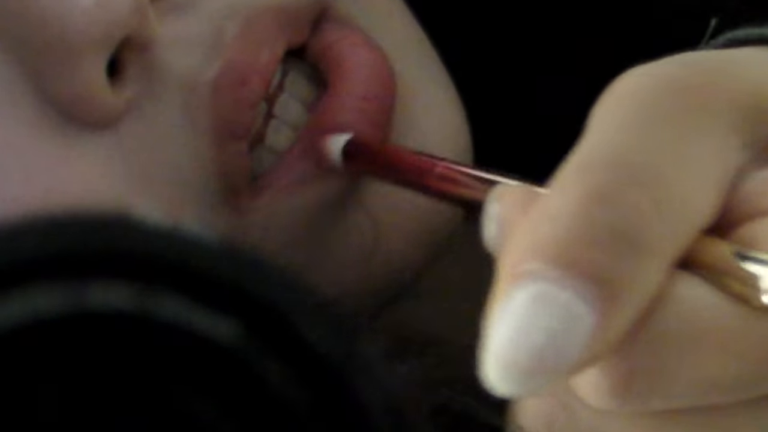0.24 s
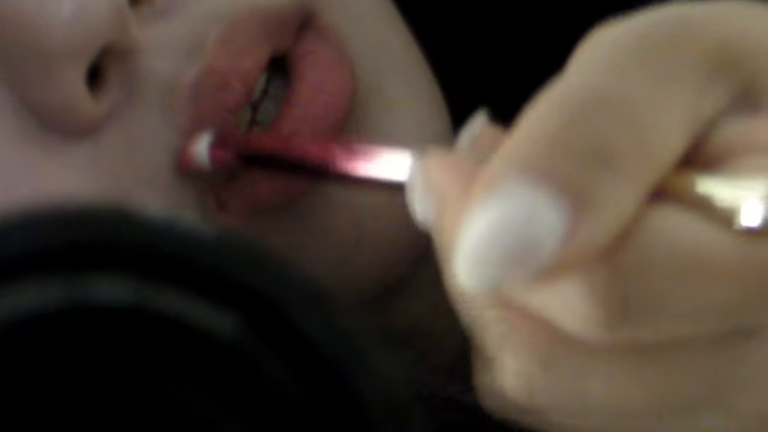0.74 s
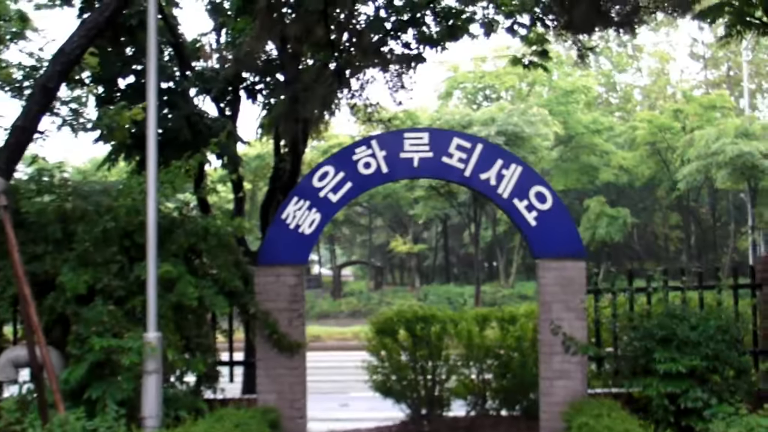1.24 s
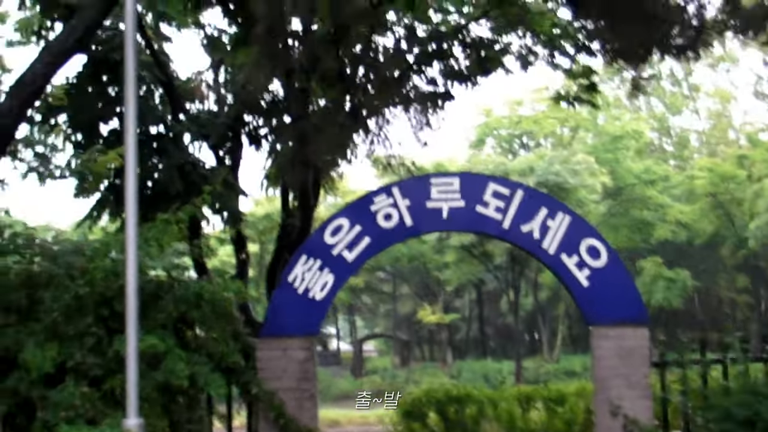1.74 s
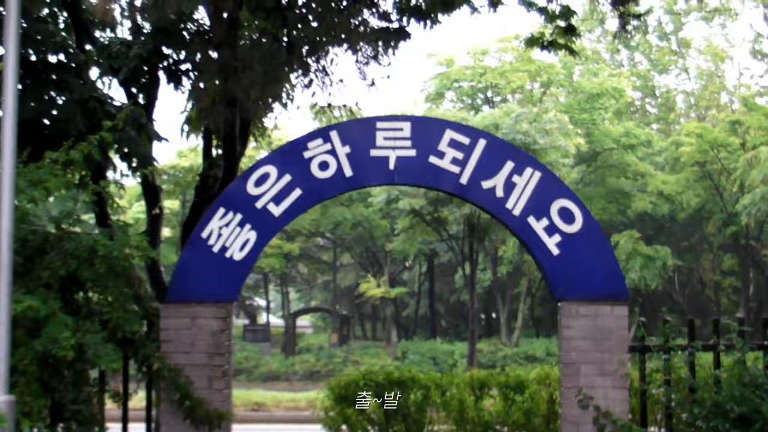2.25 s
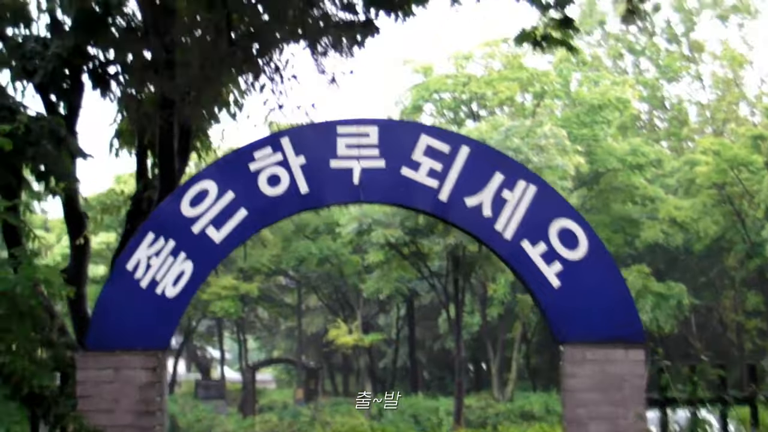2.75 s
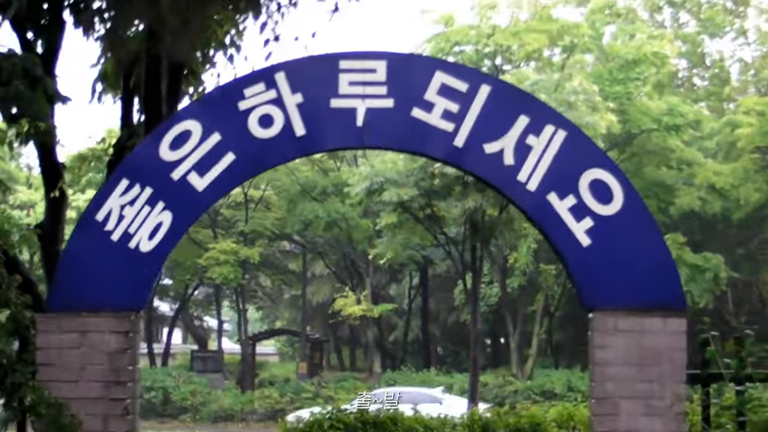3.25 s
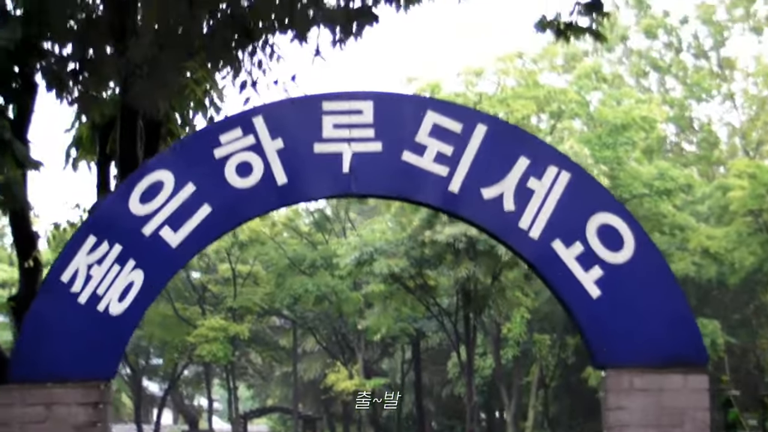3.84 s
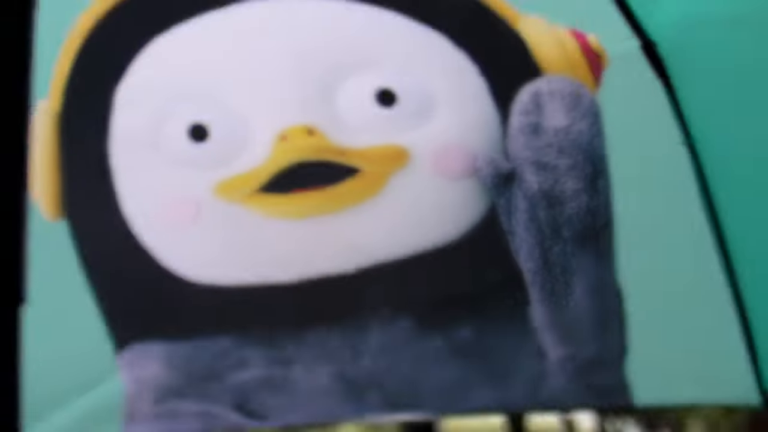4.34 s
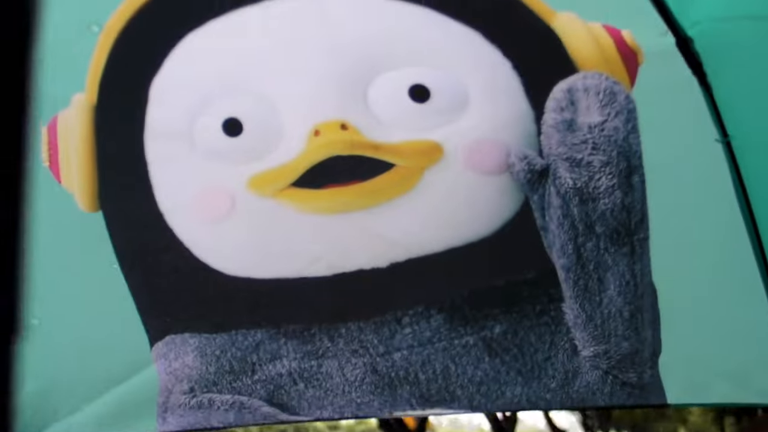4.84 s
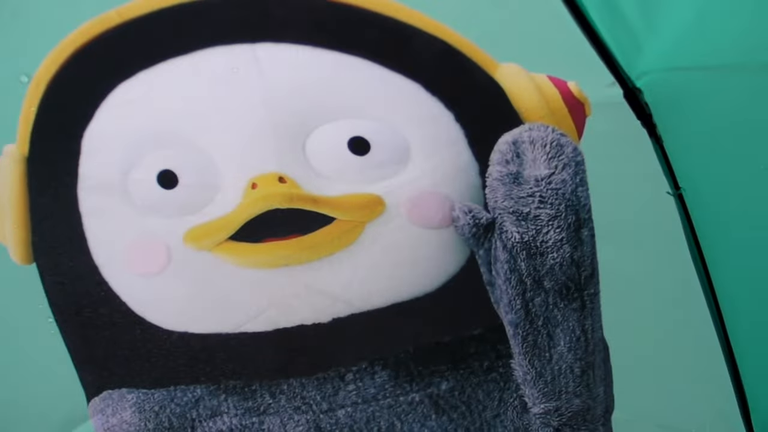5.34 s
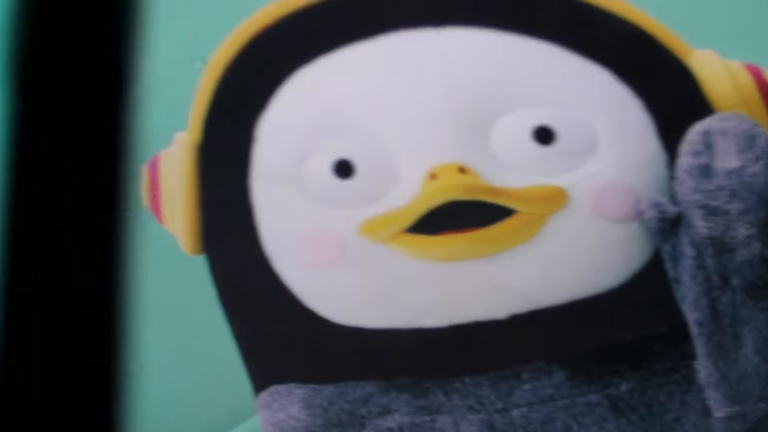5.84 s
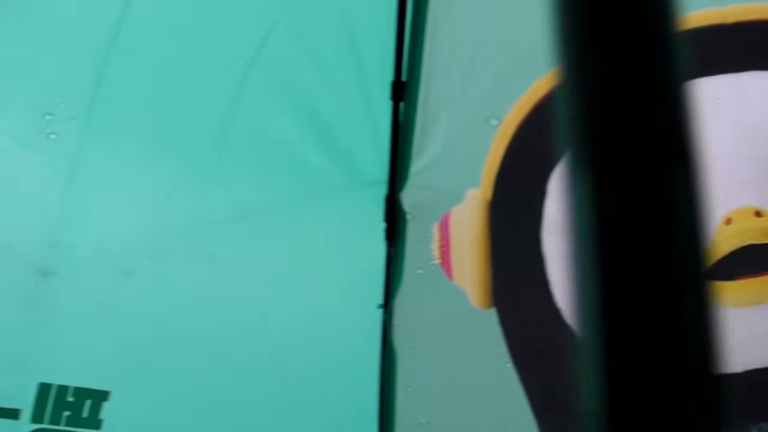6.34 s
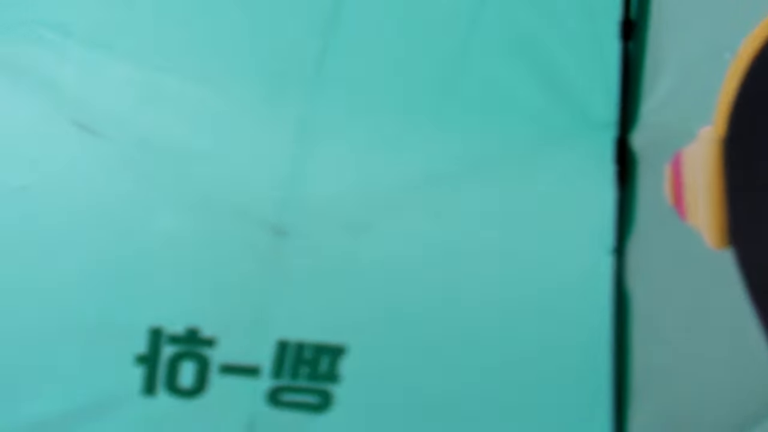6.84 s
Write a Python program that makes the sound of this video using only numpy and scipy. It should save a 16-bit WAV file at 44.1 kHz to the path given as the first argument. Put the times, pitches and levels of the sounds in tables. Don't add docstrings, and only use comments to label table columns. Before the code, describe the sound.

From 0 to 0.9 seconds there is only a quiet room: faint low mains buzz, soft hiss and a barely audible high whine. At 0.9 it cuts abruptly to a rainy roadside, with steady wet tyre roar, low rumble, fine spray and a low engine hum. Small bumps and wind puffs thump at about 1 second; a harder dull knock comes at 1.9, and a crisp drop tick at 2.6. Traffic swells from 3 to 4, with a rough falling engine note around 3.5. At 4.21 the sound drops out for about a twentieth of a second. The second view returns quieter, then builds from 5.3 with coarse tyre drumming, splashes and brighter spray until about 6.3. A car sweeps across the stereo image near 6.7 while an engine note climbs, and wet hiss continues to the cut-off around 7.1.

```python
import sys
import numpy as np
from scipy import signal
from scipy.fft import rfft, irfft, next_fast_len
from scipy.io import wavfile
from scipy.ndimage import uniform_filter1d, map_coordinates

SR = 44100
rng = np.random.default_rng(int(sys.argv[2]) if len(sys.argv) > 2 else 0)


def makeup_ratio(level_db):
    decades = np.asarray(level_db, float) / 20
    return 10 ** decades


def unload_wav(signal):
    wavfile.write(
        sys.argv[1],
        SR,
        np.round(np.clip(np.atleast_2d(signal).T, -1, 1) * 32767).astype(np.int16),
    )


N = 313242

# outdoors starts, falls silent, returns (time [s])
CUTS = (0.8914, 4.2145, 4.2648)
# (time [s], length [s], swell [dB], centre [Hz])
SPLASHES = [(.9, .1, 1.5, 12000), (2.03, 0.068, 0.5, 7000), (2.09, 0.055, 2, 9800),
            (2.625, 0.013, 14, 11000), (2.902, .15, 3.5, 7500), (3.23, 0.057, 3, 6000),
            (3.43, 0.07, 3, 10000), (3.59, 0.064, 3, 2200), (3.82, .15, 5.5, 9000),
            (4.802, 0.14, 4.5, 9800), (5.019, 0.14, 6, 9800), (5.47, .08, 3.5, 2000),
            (5.51, .15, 5.5, 8900), (5.714, 0.072, 3.5, 5500), (5.95, 0.13, 2, 11000),
            (6.5, 0.093, 3, 5530), (6.68, 0.29, 4, 6500), (6.86, .12, 0, 8000)]
# (time [s], length [s], swell [dB], centre [Hz])
JOLTS = [(.97, 0.074, 7, 130), (1.9, .04, 10, 110), (1.78, 0.04, 2, 250), (2.48, 0.057, 5, 240),
         (2.82, 0.028, 2.5, 1000), (3.17, 0.11, 1.5, 750), (3.3, 0.12, 7, 100), (3.5, 0.41, 8.5, 235),
         (4.0, .2, 2, 100), (4.35, 0.061, 8, 240), (4.88, 0.032, 4.5, 900), (5.33, 0.34, 7, 130),
         (5.45, 0.17, 3.5, 400), (6.12, 0.12, 4, 100), (6.25, 0.41, 6.5, 257), (6.6, .2, 1.5, 258),
         (6.9, 0.21, 7.5, 277), (7.08, .1, 5, 129)]


def unit(x):
    return x / np.sqrt(np.mean(x ** 2) + 1e-20)


def along(points, hz):
    f, v = np.transpose(points)
    return np.interp(np.log(hz + 1), np.log(f + 1), v)


def curves(tables):
    s, *cols = np.vstack(tables).T
    return [np.interp(np.arange(N) / SR, s, c) for c in cols]


def wobble(rate):
    knots = rng.standard_normal(int(N * rate / SR) + 4)
    return map_coordinates(knots, [np.arange(N) * rate / SR])


def filtered(x, response):
    m = next_fast_len(N + 8192)
    return irfft(rfft(x, m) * response(np.fft.rfftfreq(m, 1 / SR)), m)[..., :N]


def patchy(depth_db):
    z = signal.stft(rng.standard_normal((2, N)), nperseg=512)[2]
    field = uniform_filter1d(rng.standard_normal(z.shape[1:]), size=6, axis=0)
    field = uniform_filter1d(field, size=10, axis=1)
    return signal.istft(z * makeup_ratio(depth_db * unit(field)), nperseg=512)[1][:, :N]


def coloured(pair, spectrum):
    return unit(filtered(pair, lambda hz: makeup_ratio(along(spectrum, hz))))


def bell(s, length, rise=1):
    t = np.arange(N) / SR - s
    return np.exp(-(t / np.where(t < 0, rise * length, length)) ** 2)


def swells(events, layers_hz):
    width_octaves, rise = 0.59, 0.72
    s, length, db, hz = np.transpose(events)
    octaves = np.log2(np.array(layers_hz)[:, None] / hz)
    near = np.exp(-(octaves / width_octaves) ** 2)
    return near * db @ [bell(a, b, rise) for a, b in zip(s, length)]


def by_view(first, second):
    return np.where(np.arange(N) / SR < CUTS[2], first, second)


def ports(pair, alike, lead_ms, focus, echo, wind):
    hz, t, z = signal.stft(pair, SR, nperseg=1024)
    at, hz = np.minimum((t * SR).astype(int), N - 1), hz[:, None]
    sharp = 1 / (1 + (hz / 12500) ** 4)
    focus = np.clip(focus, 0, .9)[at] * sharp
    echo = np.clip(echo, 0, .5)[at] * sharp / (1 + (1900 / (hz + 1)) ** 4)

    def path(ms):
        return np.exp(-2j * np.pi * hz * ms / 1000)

    like = focus * path(lead_ms[at]) - echo * path(0.353) + (1 - focus - echo) * along(alike, hz)
    like = like * (1 - np.clip(wind, 0, 1)[at] / (1 + (hz / 170) ** 4))
    like = like / np.maximum(np.abs(like) / (1 - .27 * (hz > 2000)), 1)
    right = like * z[0] + np.sqrt(np.abs(1 - np.abs(like) ** 2)) * z[1]
    steer = (1 + like.real) ** (-.3 * (hz > 2000))
    return signal.istft(steer * [z[0], right], SR, nperseg=1024)[1][:, :N]


def room():
    mains_hz, whistle = 59.94, (15734, -65)
    # (multiple of the mains pitch, level [dB])
    hum = [(1, -61), (2, -62), (3, -63), (4, -62), (5, -63), (6, -62), (7, -63), (8, -66), (9, -69)]
    # (frequency [Hz], level [dB per Hz])
    hiss = [(15, -37), (25, -7), (109, -2), (270, -2.5), (353, -2.5), (707, -8.5), (1110, -9),
            (3610, -15.5), (7430, -18.5), (8060, -22), (8730, -18.5), (12000, -24.5), (14900, -19)]
    # (frequency [Hz], likeness [-1 to 1])
    room_alike = [(60, 0.21), (240, 0), (1000, 0), (15000, 0)]
    t = np.arange(N) / SR
    lines = [(k * mains_hz, db) for k, db in hum] + [whistle]
    tones = sum(makeup_ratio(db + .3) * np.sin(2 * np.pi * (hz * t + rng.random())) for hz, db in lines)
    air = coloured(rng.standard_normal((2, N)), hiss + [(14990, -24), (15020, -70)])
    air = ports(air, room_alike, *np.zeros((4, N)))
    return air * makeup_ratio(-49.5) + tones


def gusts():
    together = 1 - 0.38
    # (time [s], length [s], level [dB])
    puff_list = [
        (.98, 0.048, -32.5),
        (1.122, 0.062, -33),
        (1.91, 0.06, -28),
        (2.496, .06, -35),
        (2.704, .03, -35),
        (2.9, 0.055, -36),
        (3.4, .15, -43),
        (3.8, .1, -46),
        (4.07, 0.056, -39),
    ]
    # (frequency [Hz], level [dB per Hz])
    buffet = [(20, -20), (50, 1), (120, 3), (200, -9), (500, -19), (900, -45)]
    a, b = coloured(rng.standard_normal((2, N)), buffet)
    puffs = sum(makeup_ratio(db) * bell(s, length, 0.72) for s, length, db in puff_list)
    return puffs * np.array([a + together * b, together * b - a])


def taps():
    # (time [s], peak [dB], pitch [Hz], time to fade 60 dB [s], right gain)
    contacts = [
        (.965, -22, 130, .06, -.6),
        (1.15, -25, 95, .08, -.6),
        (1.885, -13, 110, .14, .2),
        (2.074, -24, 10650, .1, 0),
        (2.6235, -19, 10400, .02, .4),
        (2.625, -31, 13800, .06, .3),
        (2.625, -30, 11500, .06, .3),
        (2.626, -33, 15000, .05, .3),
    ]
    out, t = np.zeros((2, N + SR)), np.arange(SR // 4) / SR
    for s, db, hz, t60, right in contacts:
        rough = unit(uniform_filter1d(rng.standard_normal(len(t)), size=int(SR / hz * 3) + 1))
        fade = makeup_ratio(db - 60 * t / t60) * (1 - np.exp(-t / 0.00037))
        ring = fade * (1 + 0.4 * rough) * np.sin(2 * np.pi * hz * t)
        out[:, round(s * SR):][:, :len(t)] += [[1], [right]] * ring
    return out[:, :N]


def engines():
    # (start [s], end [s], start pitch [Hz], end pitch [Hz], unsteadiness [Hz], level [dB])
    engine_notes = [
        (0.888, 1.354, 179.5, 180.3, 1.2, -36),
        (1.49, 1.87, 180, 178, 1.2, -36.5),
        (2.5, 4.201, 52.2, 51.5, 4, -39.5),
        (3.31, 3.718, 227.7, 222, 25.3, -33),
        (5.993, 7.054, 230.2, 284.8, 31.3, -37),
    ]
    t, notes = np.arange(N) / SR, 0
    for start, end, hz, end_hz, width_hz, db in engine_notes:
        there = np.clip(np.minimum((t - start) / 0.14, (end - t) / 0.055), 0, 1)
        drift = np.interp(t, [start, end], [hz, end_hz]) + width_hz * 0.298 * wobble(7.5)
        level = makeup_ratio(db + 0.5 + 0.83 * wobble(4.5))
        notes = notes + there * level * np.sin(2 * np.pi * np.cumsum(drift) / SR)
    return notes


def boom():
    start_hz, climb_hz_per_s = 207.4, 8.5
    gear_s, rev_s, rev_hz_per_s = 5.85, 6.45, 60
    t = np.arange(N) / SR
    hz = start_hz + climb_hz_per_s * t + rev_hz_per_s * (t - rev_s) * (t > gear_s)
    level_db = -35.5 + swells(JOLTS, [240])[0]
    slow = filtered(rng.standard_normal((2, 2, N)), lambda f: 1 / (1 + (f / 60) ** 2))
    turn = 2 * np.pi * np.cumsum(hz) / SR
    return makeup_ratio(level_db - 3.5) * unit(slow[0] * np.cos(turn) + slow[1] * np.sin(turn))


def thrum():
    # (time [s], length [s], strength [0-1])
    drum_swells = [
        (5.365, 0.23, 0.76),
        (5.854, 0.22, 0.7),
        (6.104, 0.2, 1),
    ]
    # (frequency [Hz], level [dB per Hz])
    drum_tone = [(350, -30), (520, -4.5), (640, 2), (780, -3), (1100, -27)]
    strength = sum(k * bell(s, length) for s, length, k in drum_swells)
    return makeup_ratio(-28.5) * strength * coloured(patchy(1.4), drum_tone)


def droplets(count, spread_db):
    hits = []
    for where, size in zip(*rng.random((2, 2, count))):
        strength = makeup_ratio(-spread_db * np.log(1 - size))
        hits.append(np.bincount((where * (N - 1)).astype(int), strength, N))
    fade = makeup_ratio(-60 * np.arange(200) / SR / 0.0056)
    return unit(signal.fftconvolve(hits, fade[None], axes=1)[:, :N] * rng.standard_normal((2, N)))


def water():
    # (time [s], amount [dB], fineness [dB])
    spray = [
        [(0.9, -30.5, -13), (1.03, -30.5, -18), (1.5, -32, -15.5), (3.07, -30, -19), (3.26, -27, -17.5),
         (3.82, -29, -17.5), (4.21, -29, -17)],
        [(4.27, -34.5, -14.5), (5.29, -32.5, -13), (5.45, -28, -13), (5.52, -27.5, -8), (5.78, -25.5, -7),
         (6.31, -23.5, -20), (6.78, -24.5, -8.5), (7.09, -25.5, -13.5), (7.1, -29, -13)],
    ]
    # (level against the amount [dB], how far it follows fineness)
    finer = [(0.5, .02), (-5, 0.24), (-11, 0.51), (-16, .98)]
    # (frequency [Hz], level [dB per Hz])
    wet = [(1200, -26), (2300, -1), (3200, -1), (4000, -3), (5000, -7.5), (6500, -14.5), (10000, -38)]
    fine = [(2500, -32), (4200, -4), (5500, -2), (7500, -2), (8800, -8), (12000, -27.5)]
    mist = [(5000, -42), (7500, -16), (8800, 1.5), (11000, -0.5), (11500, -3.5), (11900, -9), (12500, -28)]
    haze = [(11300, -35), (11900, -6), (12400, 4), (13500, 4), (14800, 1), (15300, -5), (15750, -13)]
    drops, wash = droplets(count=9000, spread_db=2.5), unit(patchy(1.0))
    flutter_db = 0.33 * wobble(14)
    amount_db, fine_db = curves(spray)
    levels = [amount_db + db + follows * (fine_db + 17) for db, follows in finer]
    levels = levels + swells(SPLASHES, [3300, 6000, 9800, 13500])
    total = 0
    for db, shape, near in zip(levels, (wet, fine, mist, haze), (0.22, 0.078, 0.1, .3)):
        mix = np.sqrt(1 - near) * wash + np.sqrt(near) * drops
        total = total + makeup_ratio(db + flutter_db) * coloured(mix, shape)
    return total


def road():
    # (time [s], roar [dB], brightness [dB])
    tyres = [
        [(0.9, -33.5, 3.5), (1.16, -32, 3.5), (2.98, -27.5, 0.5), (3.06, -28, 1.5), (3.38, -24.5, -1),
         (3.78, -26, 0), (3.8, -24, -0.5), (4.21, -27, -1)],
        [(4.27, -32.5, 4.5), (4.32, -31, -1.5), (4.69, -32.5, 3.5), (5.35, -25, 0), (6.18, -24.5, -4.5),
         (6.2, -28, 2.5), (6.32, -25.5, 1.5), (6.83, -30.5, 5.5), (7.1, -28.5, 3)],
    ]
    # (frequency [Hz], level [dB per Hz])
    tread = [(450, -33), (700, -8), (850, -1), (955, 1.5), (1060, 0), (1200, -5.5), (1400, -8.5),
             (2500, -29)]
    rumble = [(15, -30), (30, -35), (50, -5.5), (70, -4), (110, -1.5), (160, -0.5), (300, -16), (600, -57)]
    low_roar = [(120, -15), (300, 4), (450, 3), (650, 0), (850, -0.5), (1500, -36)]
    high_roar = [(800, -23.5), (1200, -6), (1450, -1), (1750, -2.5), (2100, -3), (2600, -7.5),
                 (4000, -12.5), (7000, -62)]
    roar_db, bright_db = curves(tyres)
    body_db = by_view(-36, -32) + 0.58 * (roar_db + 28)
    rumble_db = by_view(-0.5, -1.5) - 39
    levels = [roar_db + 0.45, rumble_db, body_db, roar_db + bright_db + 0.47]
    levels = levels + swells(JOLTS + SPLASHES, [950, 100, 450, 1800])
    parts = zip(levels, (tread, rumble, low_roar, high_roar), (1.07, 2.15, 0.63, 0.66))
    return sum(makeup_ratio(db) * coloured(patchy(depth_db), shape) for db, shape, depth_db in parts)


def bearings():
    # (passing time [s], distance over speed [s], share of the sound [0-1])
    cars = [
        (3.58, 0.48, 0.27),
        (6.74, 0.54, 0.47),
    ]
    # (time [s], length [s], share [0-1])
    closing_in = (5.95, 0.88, 0.25)
    wall_echo = (5.7, .5, .33)
    port_breeze = (1.7, 1.1, .1)
    s, reach, share = (by_view(*pair) for pair in zip(*cars))
    ahead = s - np.arange(N) / SR
    blurs = (closing_in, wall_echo, port_breeze)
    closing, wall, breeze = (top * bell(at, length) for at, length, top in blurs)
    lead_ms = 0.086 * ahead / np.hypot(ahead, reach)
    return lead_ms, share + closing, wall, breeze


def scene():
    # (frequency [Hz], likeness [-1 to 1])
    outdoor_alike = [(30, 0.83), (80, 0.92), (200, 0.97), (600, 0.87), (1400, 0.93), (2500, 0.69),
                     (4500, 0.12), (8000, 0.38), (15000, -0.42)]
    traffic = road() + boom() + water() + thrum()
    outside = ports(traffic, outdoor_alike, *bearings()) + engines() + taps() + gusts()
    return np.where(np.arange(N) / SR < CUTS[0], room(), outside)


def roll_off(x):
    return signal.sosfilt(signal.butter(12, 16480, fs=SR, output="sos"), x)


def record(dry):
    # (frequency [Hz], lift [dB], phase turn [rad])
    widen = [(100, 3, 0.12), (300, 2, -0.077), (1510, 4.5, .3), (2600, 4, -0.017), (3960, 2, -0.78),
             (8000, 3.5, -0.49), (11000, 0.5, -0.45), (14800, -3.5, -.4), (15700, -7, -.4)]
    # (frequency [Hz], gain [dB])
    notch = [(7000, 1.5), (7600, 3), (7760, 7.5), (7820, -4), (7880, -30), (7950, -7), (8050, 1.5),
             (8400, -1)]
    wide_hz, wide_db, turn = np.transpose(widen)

    def response(hz):
        lift = makeup_ratio(np.interp(hz, wide_hz, wide_db)) * np.exp(1j * np.interp(hz, wide_hz, turn))
        return makeup_ratio(along(notch, hz)) * (hz < 15755) * np.array([1 + 0 * hz, lift])

    middle_and_side = np.array([dry[0] + dry[1], dry[0] - dry[1]]) / 2
    mid, side = filtered(middle_and_side, response)
    wide = np.array([mid + side, mid - side])
    wide = wide / (1 + np.abs(wide / .95) ** 6) ** (1 / 6)
    t = np.arange(N) / SR
    away = np.abs(t - CUTS[1])
    smear = makeup_ratio(-20 - 60 * away / .012)
    smear = smear + makeup_ratio(-38 - 60 * away / .07) * (t < CUTS[1] + .03)
    gate = np.clip(np.maximum((CUTS[1] - t) / .004, (t - CUTS[2]) / .0015), 0, 1)
    mix = wide * np.maximum(gate, smear * (t < CUTS[2]))
    return roll_off(mix)


dry = scene()
out = record(dry)
unload_wav(out)
```